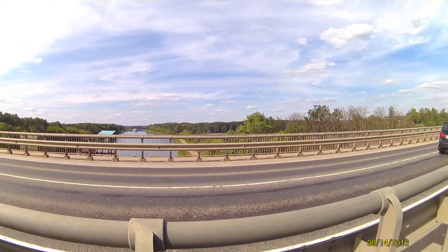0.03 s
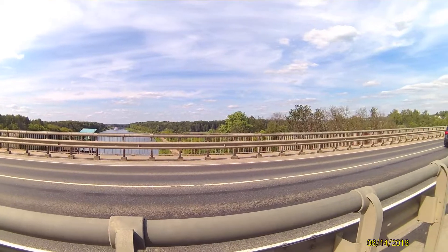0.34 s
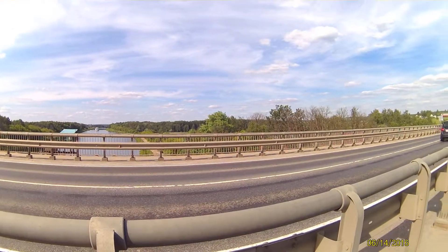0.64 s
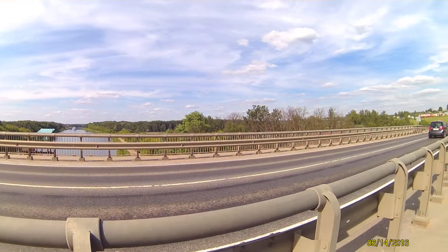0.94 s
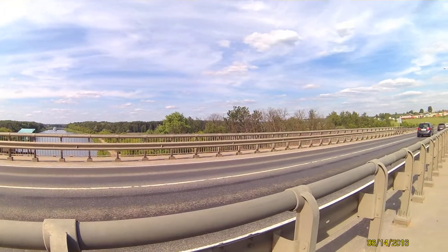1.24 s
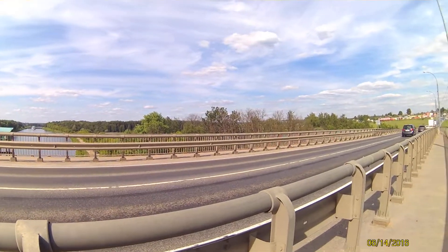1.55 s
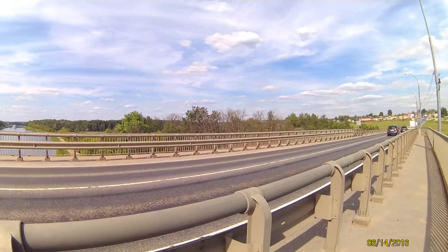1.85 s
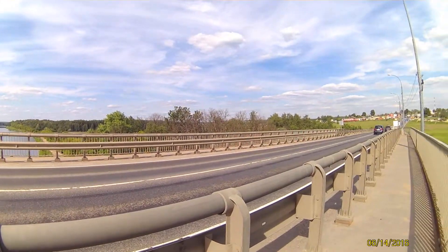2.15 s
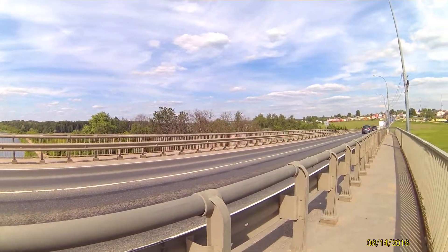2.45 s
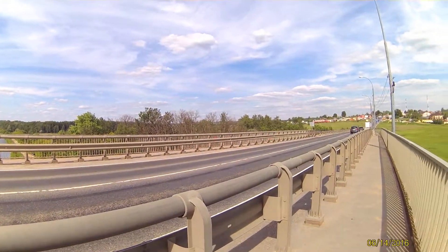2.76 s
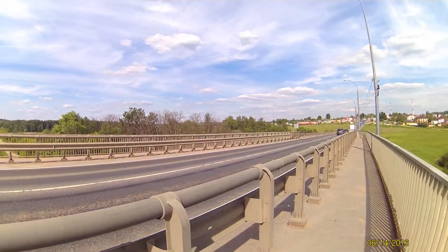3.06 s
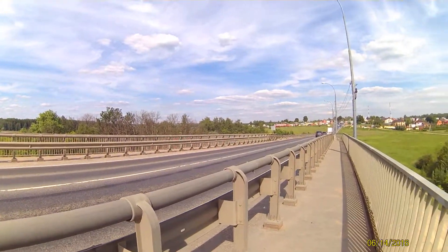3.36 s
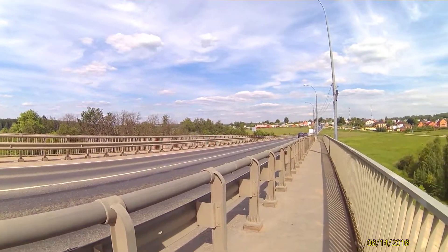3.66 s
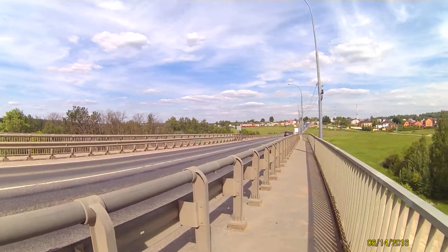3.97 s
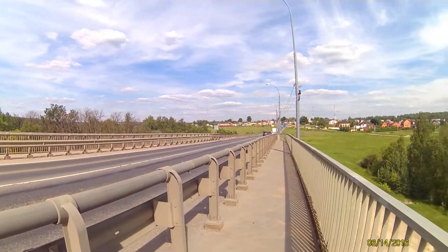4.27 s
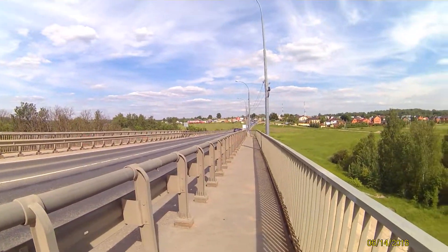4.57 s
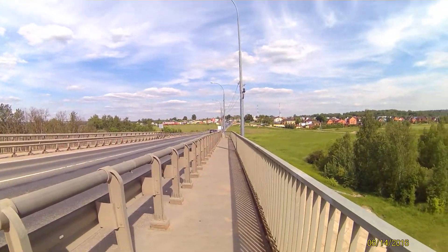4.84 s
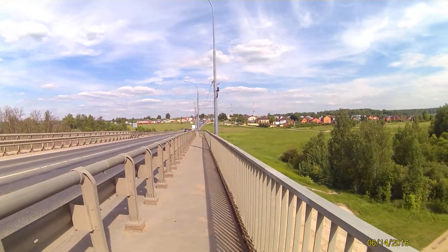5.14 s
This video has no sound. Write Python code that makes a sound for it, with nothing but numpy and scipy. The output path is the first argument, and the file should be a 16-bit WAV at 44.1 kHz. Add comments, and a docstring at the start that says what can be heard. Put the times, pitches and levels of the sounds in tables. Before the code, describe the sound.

Tyre noise from a passing car fades into a soft rush of traffic and a low bridge rumble. A lorry's diesel drone and booming exhaust build until it sweeps close by, tyres hissing and singing with a falling pitch, small stones ticking. Wind buffets the roadside microphone, hardest just after the lorry. Very faint, short, high electronic buzzes recur throughout.

```python
"""Traffic on a road bridge

A car recedes, then a diesel lorry drones up, passes close and drags a gust behind it.
Tyres roar, sing and hiss, exhausts boom, the deck rumbles, grit ticks and wind buffets the microphone.
A small camera adds a faint whine and short, very high buzzes of its own."""
import sys
import numpy as np
from scipy import signal
from scipy.fft import rfft, irfft, next_fast_len
from scipy.io import wavfile
from scipy.ndimage import uniform_filter1d

SR = 44100
rng = np.random.default_rng(int(sys.argv[2]) if len(sys.argv) > 2 else 0)


def waveform_to_disk(signal):
    """Save audio, clipped to [-1, 1], as 16-bit WAV at the path in sys.argv[1]."""
    frames = np.transpose(np.atleast_2d(signal))
    scaled = np.clip(frames, -1, 1) * 32767
    samples = np.round(scaled).astype(np.int16)
    wavfile.write(sys.argv[1], SR, samples)


N = 375291
TIME = np.arange(N) / SR


# The lorry's path: nearest_s, speed_m_s, nearest_m, loss_db_per_m
LORRY_PASS = (7.42, 11, 6.0, 0.049)
# Spectrum of its roar: frequency_hz, relative_db
LORRY_SPECTRUM = [(200, -18), (380, -2.5), (480, -3), (590, -0.5), (750, -2), (1080, 0.5), (1260, -3),
                  (1550, -3.5), (1950, -12), (2350, -14), (2900, -21.5), (3350, -32), (5000, -51.5)]

def lorry_tyres(level_db=-18, bright_db=.4, dulling=.044, rear_dull_db=2.6):
    """Rolling noise: a broad roar, duller with distance, from behind and in the barrier's shadow."""
    near_db, bearing = drive_by(*LORRY_PASS)
    shadow = barrier_shadow()
    tilt_db = bright_db + dulling * near_db - rear_dull_db * np.maximum(bearing, 0) - shadow
    roar = through_air(noise(LORRY_SPECTRUM), tilt_db, flutter_db=1, rate_hz=12)
    return roar * undb(level_db + near_db - .5 * shadow)


def lorry_tread_tone(pitch_hz=760.6, level_db=-19, doppler=.095, side_dip_db=14):
    """Doppler shift: uneven tread blocks sing fore and aft in a band that falls as the lorry passes."""
    near_db, bearing = drive_by(*LORRY_PASS)
    gain = undb(level_db + 1.3 * near_db - side_dip_db * (1 - bearing ** 2))
    return narrow_noise(pitch_hz * (1 - doppler * bearing), width_hz=130) * gain


def lorry_exhaust(pitch_hz=63.3, level_db=-19.5, throb_s=.59, crest_s=5.56, throb_depth=.72):
    """Amplitude modulation: the exhaust booms harder under load and throbs until the lorry is close."""
    near_db, _ = drive_by(*LORRY_PASS)
    beat = np.abs(np.cos(np.pi * (TIME - crest_s) / throb_s))
    throb = 1 - throb_depth * (1 - beat) * (1 - step(6.9, .15))
    load = .4 * step(3.5, .2) + .6 * step(4.8, .06) - step(8.42, .036)  # light, full, off
    boom = tone(pitch_hz, wander_rad=.31, rate_hz=8)
    return boom * throb * load * undb(level_db + .9 * near_db + .5 * walk(11))


# Crank rate as heard: time_s, rate_hz
CRANK_RATE = [(3.7, 30), (5.4, 31.4), (6.3, 31.55), (7.1, 30.9), (8, 30.35), (8.5, 30.2)]
# Engine harmonics, relative levels by viewpoint: crank_multiple, far_db, front_db, rear_db
ENGINE_ORDERS = [(4, 0, -7.5, -3), (6, -12, -2.5, 7), (9, 1.5, 0, -3), (12, -12, -18, -2)]

def lorry_engine(level_db=-31.5):
    """Engine orders: harmonics of the crank rate drone, sag in pitch and shift in balance on passing."""
    crank_hz = np.interp(TIME, *np.transpose(CRANK_RATE))
    near_db, _ = drive_by(*LORRY_PASS)
    angle = 2 * np.pi * np.cumsum(crank_hz * (1 + .002 * walk(14))) / SR
    load, close = step(3.56, .22), step(5.34, .37)
    behind = step(7.86, .078) - step(8.36, .09)  # the tailpipe sweeps past the microphone
    drone = 0
    for order, far_db, front_db, rear_db in ENGINE_ORDERS:
        harmonic = unit(np.sin(round(order) * angle + .35 * walk(14))) * undb(1.6 * walk(13))
        drone += harmonic * undb(far_db + close * (front_db - far_db) + behind * (rear_db - front_db))
    return drone * load * undb(level_db + .4 * near_db)


# The car's path: nearest_s, speed_m_s, nearest_m, loss_db_per_m
CAR_PASS = (0.18, 11.6, 14.4, .12)
# Spectrum of its roar: frequency_hz, relative_db
CAR_SPECTRUM = [(200, -6.5), (310, 0.5), (400, -9), (520, -4), (800, -7), (900, -3), (1000, 2), (1130, -3),
                (1280, -5), (1420, -4.5), (1650, -9.5), (2000, -16), (2300, -21), (3300, -38.5),
                (5000, -57)]

def car_tyres(level_db=-25.5, rear_db=6.5, bright_db=.75, dulling=.15):
    """Directivity: tread roar with a hump near 1 kHz beams rearwards and dulls up the road."""
    near_db, bearing = drive_by(*CAR_PASS)
    roar = through_air(noise(CAR_SPECTRUM), bright_db + dulling * near_db, flutter_db=.26, rate_hz=8.3)
    return roar * undb(level_db + near_db + rear_db * bearing)


# Exhaust booms: peak_s, half_length_s, level_db, pitch_hz
CAR_BOOMS = [(.25, 0.13, -35, 54.8), (.72, 0.16, -28.5, 62.6), (1.4, 0.34, -37.5, 55.1)]

def car_exhaust():
    """Pulsating flow: the exhaust booms now and then on a low tone."""
    return sum(tone(hz, wander_rad=.5, rate_hz=6.12) * swell(s, half_s, db)
               for s, half_s, db, hz in CAR_BOOMS)


# Swells of the tread tone: peak_s, half_length_s, level_db
CAR_TREAD_SWELLS = [(1.081, .2, -29), (2.85, 0.24, -34)]

def car_tread_tone(pitch_hz=1040):
    """Narrow-band noise: the car's tread sings, swelling twice as the car draws away."""
    return narrow_noise(pitch_hz, width_hz=220) * swells(CAR_TREAD_SWELLS)


# Spectrum of the deck: frequency_hz, relative_db
DECK_SPECTRUM = [(30, -27), (60, -2.5), (100, -1.5), (150, -0.5), (210, 2), (290, 0), (350, -6),
                 (450, -10.5), (900, -27)]
# Rumbles between the passes: peak_s, half_length_s, level_db
DECK_SWELLS = [(1.95, 0.69, -28.3), (4.75, 0.67, -33), (5.55, 0.36, -31)]

def deck():
    """Structure-borne sound: wheels keep the deck rumbling, most as each vehicle is nearest."""
    car_db, _ = drive_by(*CAR_PASS)
    lorry_db, _ = drive_by(*LORRY_PASS)
    gain = power_sum(undb(-26.5 + 1.04 * car_db), undb(-22 + .81 * lorry_db), swells(DECK_SWELLS))
    return noise(DECK_SPECTRUM) * gain * undb(.48 * walk(13))


# Spectrum of the buffeting: frequency_hz, relative_db
WIND_SPECTRUM = [(8, -18), (18, 1.5), (32, 1), (50, 7.5), (75, 1.5), (130, -2.5), (400, -65)]
# Gusts: peak_s, half_length_s, level_db
GUSTS = [(5.42, .13, -36), (7.53, 0.21, -25.5), (7.964, 0.14, -18.5)]

def wind(breeze_db=-39):
    """Turbulent pressure: eddies buffet the microphone, hardest in the lorry's wake."""
    return noise(WIND_SPECTRUM) * power_sum(undb(breeze_db), swells(GUSTS)) * undb(walk(6.7))


# Spectrum of distant tyres: frequency_hz, relative_db
FAR_SPECTRUM = [(400, -5.5), (700, -10.5), (1000, -20), (1250, -3.5), (1420, 0), (1750, -5.5), (2100, -19)]
# Distant vehicles: nearest_s, half_length_s, rush_db, hiss_db, spray_db
FAR_PASSES = [(1.6, .3, -42, -56.5, -72), (4.3, 0.52, -38, -53.5, -65), (5.623, 0.21, -37, -56, -68),
              (8.5, .45, -28.5, -55, -72)]

def far_traffic(steady_db=-42):
    """Incoherent sources: tyres further along the road merge into a soft rush."""
    gain = power_sum(undb(steady_db), swells(row[:3] for row in FAR_PASSES))
    return through_air(noise(FAR_SPECTRUM), tilt_db=0, flutter_db=1.5, rate_hz=7.6) * gain


# Spectra of the tread's hiss and its higher spray: frequency_hz, relative_db
HISS_SPECTRUM = [(2500, -8), (3400, -10), (3900, 3.5), (4500, 0.5), (5200, -7.5), (5700, -8.5), (6100, -7),
                 (6600, -9), (7200, -18.5), (9000, -40)]
SPRAY_SPECTRUM = [(5000, -14), (7300, -3.5), (8500, 1), (9500, -0.5), (11300, -1), (12500, -7),
                  (14000, -12), (15500, -4)]

def tread_hiss():
    """Air pumping: air squeezed from the tread hisses, with a grainy spray when close and unscreened."""
    car_db, _ = drive_by(*CAR_PASS)
    lorry_db, _ = drive_by(*LORRY_PASS)
    shadow = barrier_shadow()
    far_hiss = swells((s, half_s, db) for s, half_s, _, db, _ in FAR_PASSES)
    far_spray = swells((s, half_s, db) for s, half_s, _, _, db in FAR_PASSES)
    hiss_gain = power_sum(undb(-55.5 + .6 * car_db), undb(-43 + lorry_db - 3 * shadow), far_hiss)
    spray_gain = power_sum(undb(-69 + car_db), undb(-54.5 + 1.16 * lorry_db - 6 * shadow), far_spray)
    hiss = noise(HISS_SPECTRUM) * hiss_gain * undb(.72 * walk(35))
    spray = noise(SPRAY_SPECTRUM) * spray_gain * undb(1.1 * walk(150))
    return hiss + spray


# Spectrum of a tick: frequency_hz, relative_db
GRIT_SPECTRUM = [(2000, -10), (3400, -9), (4200, 14.5), (5400, 3), (6500, 2), (7400, -6), (8500, 1.5),
                 (11500, -13), (14000, -17)]
# Stone impacts: start_s, level_db, ring_s
GRIT_TICKS = [(.51, -53, .06), (.675, -54, .03), (1.41, -57, 0.054), (4.632, -47, .03), (5.468, -42, .008),
              (7.06, -40, 0.029), (7.095, -39, 0.046), (7.237, -39, 0.049), (7.343, -36.5, 0.068),
              (7.472, -42, .06), (7.59, -40, 0.06), (7.705, -44, 0.04)]

def grit(attack_s=.0005):
    """Damped impacts: small stones tick on the road and die away exponentially."""
    envelope = np.zeros(N)
    for start_s, db, ring_s in GRIT_TICKS:
        age = np.maximum(TIME - start_s, 0)
        envelope += undb(db) * (1 - np.exp(-age / attack_s)) * np.exp(-3 * age / ring_s)
    return noise(GRIT_SPECTRUM) * envelope


# Swells of a thin whistle: peak_s, half_length_s, level_db, pitch_hz
WHISTLES = [(2.43, .07, -65, 6000), (4.0, .3, -63.5, 6150), (6.07, .22, -57.5, 6080),
            (7.4, 0.42, -56, 6230), (8.42, .2, -56.5, 6549)]

def whistle():
    """Narrow-band noise: a faint, airy whistle swells and fades above the roar."""
    return sum(narrow_noise(hz, width_hz=750) * swell(s, half_s, db) for s, half_s, db, hz in WHISTLES)


# Spectrum of a buzz: frequency_hz, relative_db
BUZZ_SPECTRUM = [(10000, -24), (12300, -7), (12800, -6), (13250, 0), (13600, -4), (14000, -13),
                 (15500, -18)]
# Buzzes: time_s
BUZZ_TIMES = [.712, 1.214, 1.832, 2.433, 3.101, 3.741, 4.305, 5.046, 5.723, 6.253, 6.953, 7.727, 8.269]
# Whine tones: pitch_hz, level_db
WHINE_TONES = [(13186, -84.5), (15478, -80)]

def electronics(pulse_hz=118, buzz_s=.034, buzz_db=-59, hiss_db=-64):
    """Self-noise: the camera adds white hiss, a thin whine and bursts of four high pulses."""
    gate = np.zeros(N)
    for time_s in BUZZ_TIMES:
        age = TIME - time_s + .002
        gate += (age > 0) * (age < buzz_s) * np.abs(np.sin(np.pi * pulse_hz * age))
    whine = sum(undb(db) * tone(hz, wander_rad=.5, rate_hz=40) for hz, db in WHINE_TONES)
    buzz = noise(BUZZ_SPECTRUM) * gate * undb(buzz_db)
    return buzz + whine + undb(hiss_db) * rng.standard_normal(N)


def drive_by(nearest_s, speed_m_s, nearest_m, loss_db_per_m):
    """Spherical spreading plus loss: dB against the nearest point, and bearing (-1 coming, +1 going)."""
    along = speed_m_s * (TIME - nearest_s)
    distance = np.hypot(along, nearest_m)
    near_db = 20 * np.log10(nearest_m / distance) - loss_db_per_m * (distance - nearest_m)
    return near_db, along / distance


def barrier_shadow():
    """Acoustic shadow: 1 while the crash barrier hides the lorry's wheels, 0 once they are clear."""
    return 1 - step(6.92, .14)


def through_air(x, tilt_db, flutter_db, rate_hz):
    """Scintillation: turbulence flutters each octave on its own; the tilt per octave pivots at 1 kHz."""
    out = np.zeros(N)
    for octave in range(-2, 3):
        lowpass = signal.butter(2, 1000 * 2 ** (octave + .5), fs=SR, output="sos")
        band = signal.sosfiltfilt(lowpass, x) if octave < 2 else x
        x = x - band
        out += band * undb(octave * tilt_db + flutter_db * walk(rate_hz))
    return out


def noise(spectrum):
    """Spectral shaping: noise of rms 1, falling 24 dB per octave beyond the spectrum's ends."""
    size = next_fast_len(N)
    octave = np.log2(np.maximum(np.arange(size // 2 + 1) * SR / size, 1))
    hz, db = np.transpose(spectrum)
    beyond = np.abs(octave - np.clip(octave, np.log2(hz[0]), np.log2(hz[-1])))
    shape = undb(np.interp(octave, np.log2(hz), db) - 24 * beyond)
    return unit(irfft(rfft(rng.standard_normal(size)) * shape, size)[:N])


def narrow_noise(hz, width_hz):
    """Quadrature modulation: a noise band of rms 1 whose centre may glide."""
    angle = 2 * np.pi * np.cumsum(np.broadcast_to(hz, N)) / SR
    return unit(walk(2 * width_hz) * np.cos(angle) + walk(2 * width_hz) * np.sin(angle))


def tone(hz, wander_rad, rate_hz):
    """Phase modulation: a sine of rms 1 that wavers at random."""
    return unit(np.sin(2 * np.pi * hz * TIME + wander_rad * walk(rate_hz)))


def walk(rate_hz):
    """Sample and hold: random levels, smoothed twice, of rms 1."""
    hold = max(int(SR / rate_hz), 1)
    held = rng.standard_normal(N)[np.arange(N) // hold]
    return unit(uniform_filter1d(uniform_filter1d(held, hold), hold))


def swell(peak_s, half_s, db):
    """Lorentzian envelope: a gain that rises to a peak and falls away."""
    return undb(db) / (1 + .5 * ((TIME - peak_s) / half_s) ** 2)


def swells(rows):
    """Power sum of several swells."""
    return power_sum(*(swell(*row) for row in rows))


def power_sum(*gains):
    """Incoherent addition: unrelated sounds add in power."""
    return np.sqrt(sum(g ** 2 for g in gains))


def step(centre_s, half_s):
    """Sigmoid transition from 0 to 1."""
    return .5 + .5 * np.tanh((TIME - centre_s) / half_s)


def undb(db):
    """Decibels to gain."""
    return 10 ** (np.asarray(db) / 20)


def unit(x):
    """Normalisation to rms 1."""
    return x / np.sqrt(np.mean(x ** 2))


def scene():
    """Superposition: traffic, bridge and wind add at one microphone."""
    lorry = lorry_tyres() + lorry_tread_tone() + lorry_exhaust() + lorry_engine()
    road = far_traffic() + deck() + tread_hiss() + grit()
    car = car_tyres() + car_exhaust() + car_tread_tone()
    return (lorry + car + road + whistle() + wind() + electronics())[None]


def record(dry, open_s=.0712, cutoff_hz=15650):
    """Gating and band limiting: the camera opens its input a moment late and cuts the top."""
    opening = np.sin(np.pi / 2 * np.clip((TIME - open_s) / .002, 0, 1)) ** 2
    lowpass = signal.ellip(10, .2, 80, cutoff_hz, fs=SR, output="sos")
    return signal.sosfilt(lowpass, dry * opening)


dry = scene()
out = record(dry)
waveform_to_disk(out)
```